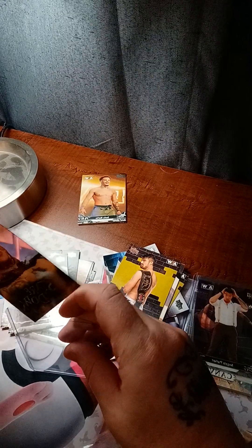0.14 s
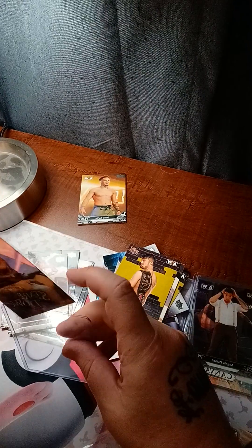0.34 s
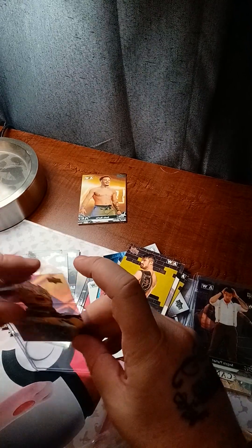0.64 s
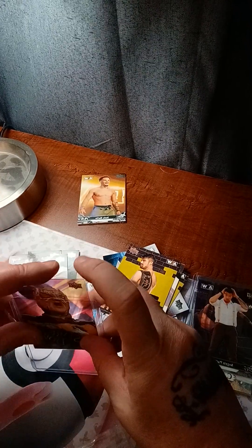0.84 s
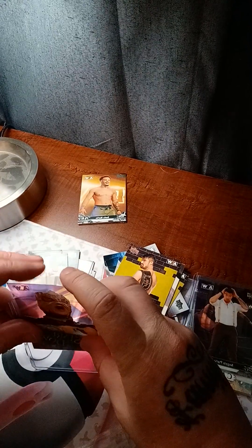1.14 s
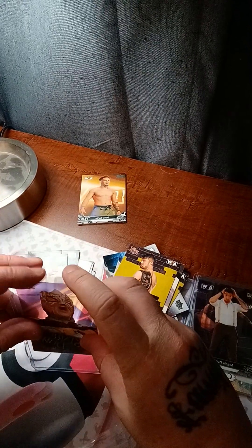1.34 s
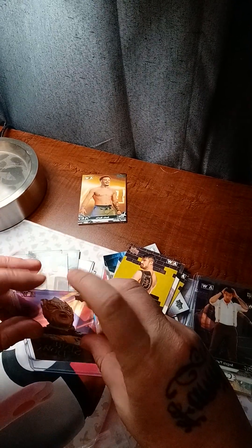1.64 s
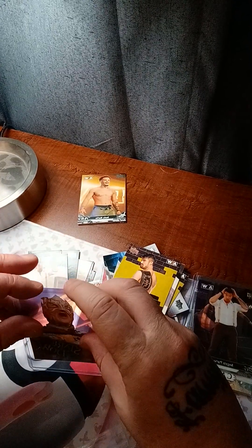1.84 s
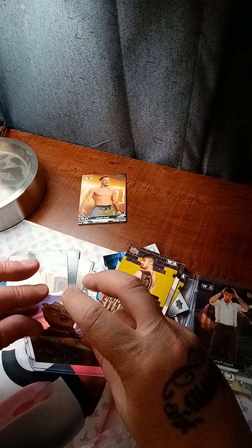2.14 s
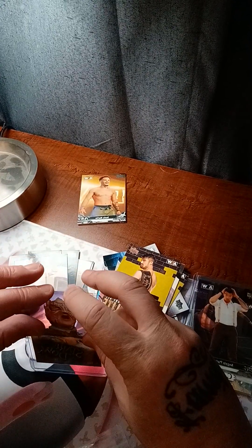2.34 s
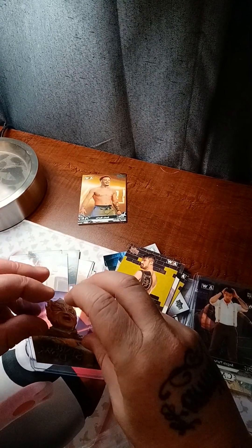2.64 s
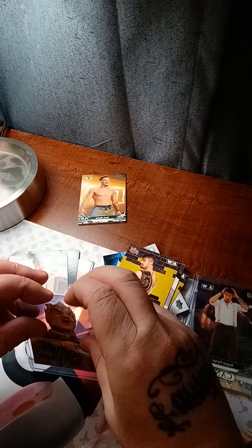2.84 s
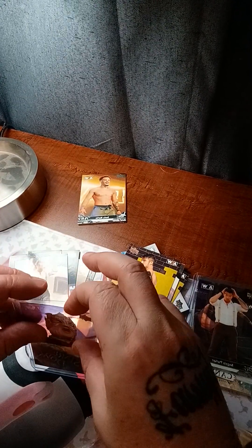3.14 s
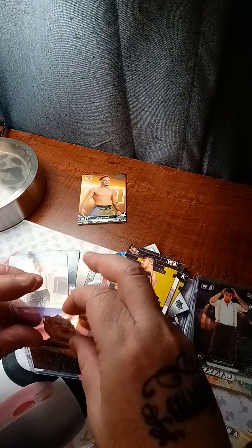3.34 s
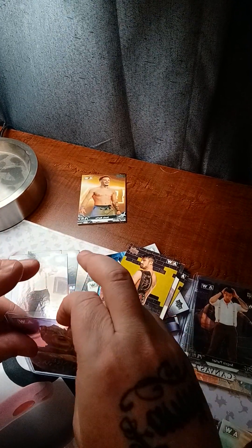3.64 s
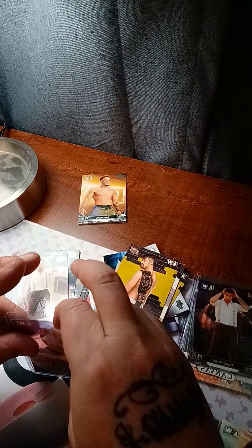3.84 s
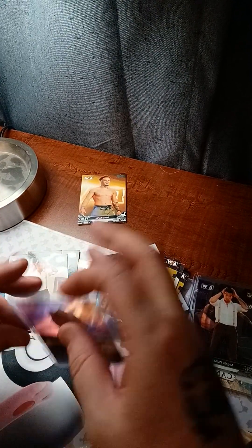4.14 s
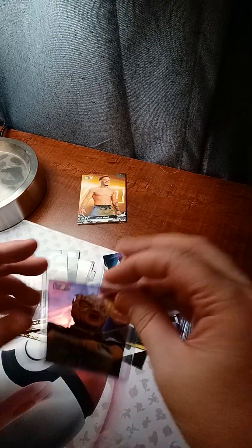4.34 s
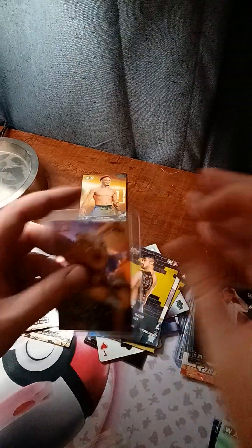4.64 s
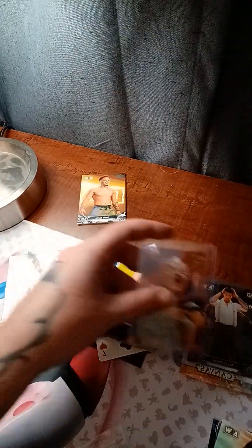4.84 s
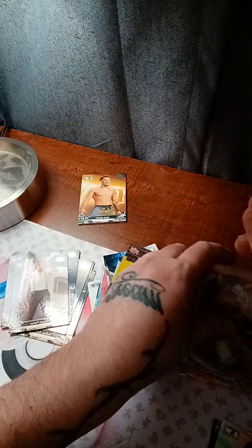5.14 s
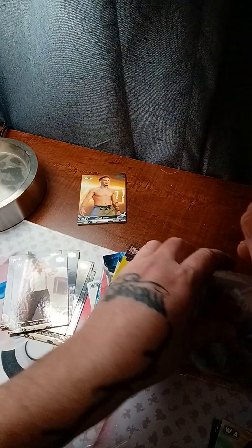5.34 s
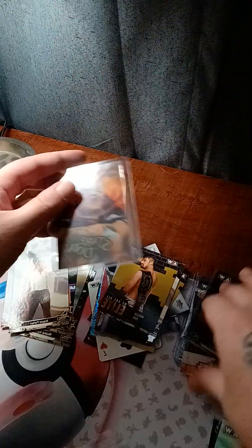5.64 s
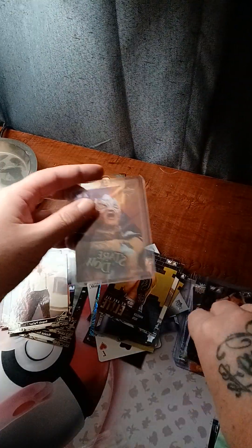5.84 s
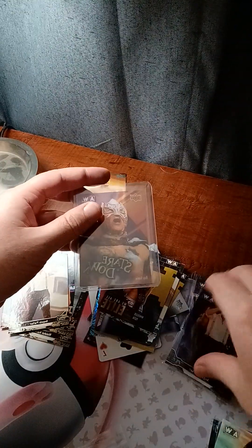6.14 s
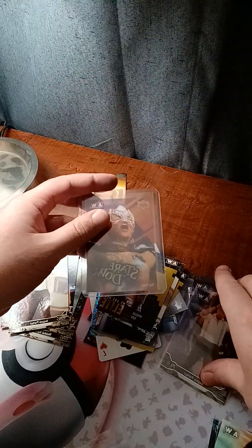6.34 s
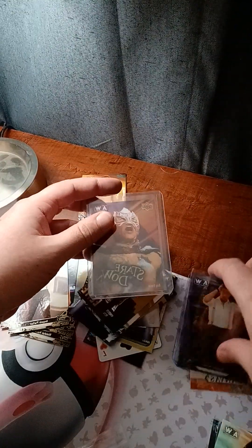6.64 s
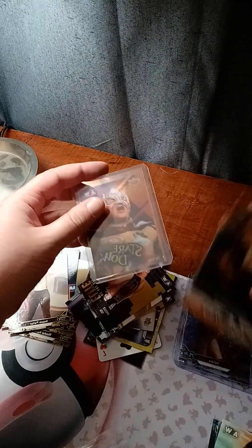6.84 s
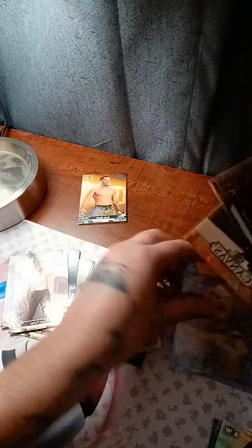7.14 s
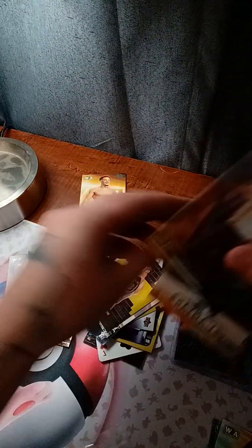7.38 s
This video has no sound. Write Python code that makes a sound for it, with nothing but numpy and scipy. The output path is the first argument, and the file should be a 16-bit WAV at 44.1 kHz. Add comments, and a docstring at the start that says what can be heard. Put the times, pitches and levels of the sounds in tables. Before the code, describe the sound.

Near a phone microphone in a small quiet room, hands work cards into stiff plastic holders over a wooden table. From 0.1 to 0.9 seconds, bright dry snaps and crackles come in small clusters, the sharpest near 0.55 and 0.8, with grainy scraping. Between 1.0 and 1.8, more clicks and short rubs, with soft low table bumps. Around 1.9 to 2.4 sliding turns faint, with very thin high squeaks and a wavering whispery scrape. From 2.8 to 4.7 it is nearly quiet, only tiny ticks and dull touches. Faint squeaks and rubbing return at 4.7 to 5.5, a bump at 5.7, and a crisp snap at 5.9. A tight burst of crackling runs 6.45 to 6.7. At 7.13, 7.16 and 7.21 a holder hits the stack in three growing knocks, the last a loud hard clack with woody thump and brief rattling tail, then a faint rub. Low, soft room noise continues throughout.

```python
"""Film snaps and scrapes throughout, as hands slide trading cards into stiff plastic holders by a phone in a quiet room.
Buckling film gives short resonant bursts; friction gives grainy noise, thin squeals and a wandering band.
Each touch excites the modes of the wooden table and swells a low rumble; the holder's rim ticks faintly.
A holder lands on a stack in three knocks at the end; a decaying tail and steady air noise lie behind."""
import sys
import numpy as np
from scipy import signal
from scipy.fft import rfft, irfft, next_fast_len
from scipy.io import wavfile
from scipy.ndimage import uniform_filter1d

SR = 44100
rng = np.random.default_rng(int(sys.argv[2]) if len(sys.argv) > 2 else 0)


def to_wav(s):
    """Save 16-bit WAV."""
    ch = np.atleast_2d(s).T  # columns
    pcm = np.round(np.clip(ch, -1, 1) * 32767)  # PCM
    wavfile.write(sys.argv[1], SR, pcm.astype(np.int16))


N = 331191

# the holder landing on the stack: t/s, relative peak/dB, body/dB and fizz/dB against the peak,
# body ring f/Hz, rasp ring f/Hz, decay time constant/ms
LANDINGS = [(7.1255, -37.5, -5.5, -6.5, 1050, 6750, 2), (7.1577, -20, 4, -2.5, 1840, 6390, 1.92),
            (7.212, -3.5, -4.5, -15.5, 790, 2920, 1.86)]
# where the hands work: t/s, left over right level/dB
HAND_PLACES = [(0, -1), (1.0, -1.5), (1.7, -1.5), (2.2, -3), (2.8, 0), (4.5, -0.5), (5.1, -2.5),
               (5.75, -1.5), (5.9, -2), (6.7, -0.5), (7.2, -1)]
# hands and cards meeting the table: t/s, level/dB, contact time/ms, swell of the low rumble/dB
TOUCHES = [(0.214, -50, 1.6, -60), (0.286, -40, 3.5, -52), (0.546, -62.5, 4, -72), (0.789, -52.5, 3.8, -61),
           (0.898, -112, 3.7, -74), (1.049, -64, 4.3, -56.5), (1.157, -46.5, 3.1, -62),
           (1.35, -53.5, 1.9, -73), (1.553, -56.5, 9.6, -67), (1.745, -47, 1.8, -65), (1.902, -80, 4, -78),
           (2.227, -58.5, 1.9, -69), (2.433, -60, 2.3, -63), (2.65, -64, 4.9, -62), (2.96, -72, 4.3, -70),
           (3.039, -67, 3.1, -56.5), (3.275, -67, 3.4, -62), (3.448, -76, 4, -68), (3.689, -53, 3.3, -55.5),
           (3.818, -60, 4.4, -74), (4.025, -59, 3.9, -65.5), (4.272, -59, 3, -58), (4.471, -63, 2.3, -92),
           (4.546, -65, 3.8, -90), (4.751, -76, 3.4, -72), (4.889, -60.5, 1.3, -95), (5.103, -47.5, 4, -68),
           (5.36, -55, 6.9, -59), (5.721, -41, 16.4, -53), (5.896, -48, 3.5, -65), (6.201, -65, 6.2, -69),
           (6.389, -76, 4, -56.5), (6.677, -67, 1.3, -60), (7.123, -43, 4.2, -76), (7.16, -26.5, 3.9, -69),
           (7.213, -12, 3.7, -53), (7.252, -20, 3, -55)]


def snaps():
    """Impulsive buckling: a fast-rising noise burst decays in milliseconds and rings where the sheet is held."""
    # film buckling, columns as for the landings
    buckles = [(0.1264, -34, -20.5, -3.5, 745, 7260, 2.8), (0.2164, -34, -12.5, -9.5, 1150, 7050, 1.9),
               (0.2876, -28, -4.5, -16.5, 1550, 6060, 1.9), (0.39, -38.5, -39, -8, 1190, 7180, 1.2),
               (0.4014, -39, -30, -12, 1550, 4470, 1.3), (0.409, -34.5, -18, -6, 1610, 4480, 0.93),
               (0.4168, -39.5, -16, -3, 1570, 5530, 1.5), (0.423, -35, -19.5, -4, 1660, 4930, 3.4),
               (0.431, -33, -20, -10.5, 1620, 5360, 1.1), (0.4738, -49, -10, 2, 1570, 6530, 1.2),
               (0.5218, -42, -13, 3, 2130, 5530, 1.7), (0.5402, -41.5, -19, -2, 2150, 5130, 4.5),
               (0.5525, -21, -26.5, -12.5, 1700, 8000, 2.6), (0.6501, -41.5, -38, -35, 2300, 4700, 4),
               (0.7796, -34.5, -16, -23, 2310, 4330, 3.8), (0.794, -27, -19.5, -11.5, 2300, 6100, 2.6),
               (0.8082, -33, -18, -5, 2250, 6040, 2.5), (1.0296, -49.5, -11, -19, 1180, 5170, 1.3),
               (1.1138, -32.5, -11, -10, 2300, 6170, 1), (1.1567, -37, -0.5, -3, 1100, 5620, 1.23),
               (1.1645, -32, -17, -7, 2320, 4600, 2), (1.1765, -45, -24, -14, 2100, 5270, 1.5),
               (1.252, -41, -12, -24, 1130, 7100, 2), (1.3045, -30, -31, -30, 2300, 4400, 1.7),
               (1.4564, -53, -7.5, -21, 2180, 6570, 3.2), (1.506, -28.5, -48, -52, 1600, 6700, 1.16),
               (1.555, -44.5, -29, -9, 1610, 5570, 1.4), (1.6524, -44, -12, -6, 2160, 5880, 3.2),
               (1.6634, -48, -3, -6, 1300, 4890, 0.94), (1.6683, -34.5, 3.5, -8, 1750, 3470, 0.68),
               (1.7446, -35.5, -1, 0, 780, 4530, 2.5), (1.7519, -26, -9, -6.5, 2400, 3660, 2.5),
               (1.865, -59, -3, -19, 1560, 3200, 1.7), (1.938, -51, -22, -12, 1560, 6500, 3),
               (2.0414, -43.5, -17, -17, 1200, 6760, 1.3), (2.304, -54.5, -3, -19, 1610, 4000, 1.6),
               (2.3201, -49, -18, -27, 1610, 3450, 1.45), (2.4076, -42, -18, -18, 2220, 6360, 2),
               (2.4357, -57.5, 0.5, -13, 1780, 5600, 5.2), (2.4663, -53.5, -25, -9, 1480, 5000, 1.6),
               (2.5407, -59.5, -8, -10, 1620, 5430, 7.2), (2.5606, -43.5, -7.5, -20, 2140, 4730, 3),
               (2.6463, -40.5, -29, -19, 2300, 7300, 1.5), (2.817, -48, -4, -9, 825, 3240, 1.3),
               (3.202, -60.5, -17, -8, 724, 3120, 1.9), (3.6978, -58.5, -24, -15, 735, 2520, 2.5),
               (4.0537, -53, -4.5, -7, 2490, 6700, 1.9), (4.276, -41.5, -13, -40, 2480, 3450, 6.3),
               (4.4706, -41.5, -14.5, -21, 810, 6350, 3.4), (4.49, -47.5, -7, -6, 1200, 4500, 1.8),
               (4.5502, -50.5, -30, -10, 756, 5500, 5.6), (5.0114, -53.5, -3.5, -2, 2180, 6940, 1.3),
               (5.053, -49, -9, -10, 1840, 5270, 8.8), (5.0784, -40, -9, -13, 1590, 7200, 2.2),
               (5.0914, -48, -3, -5, 2160, 4770, 4.2), (5.1016, -44, 13.5, -30, 1730, 2610, 1.95),
               (5.1466, -35, -9.5, -18, 2170, 5850, 0.64), (5.3544, -44.5, -3, -8, 2080, 3200, 3.2),
               (5.365, -44.5, -7, -8, 1530, 2530, 2.9), (5.3864, -57.5, 15, -13, 2180, 3160, 1.4),
               (5.446, -51, -3, -21, 1530, 3190, 1.3), (5.4775, -48.5, -15, -31, 1290, 4860, 1.5),
               (5.7854, -42, -9, -2, 1610, 2630, 2.5), (5.8978, -23, -6, -6.5, 1440, 7400, 1.3),
               (6.2894, -60, -6, -23, 1350, 6400, 1.3), (6.4658, -46.5, -21, -6, 1540, 3960, 2.1),
               (6.4879, -37, -10.5, -1, 2370, 5100, 1.1), (6.5244, -37.5, -15, -26, 2290, 4600, 1),
               (6.542, -27.5, -32, -9, 1550, 6570, 0.95), (6.575, -31, -43, -11, 1790, 4500, 1.4),
               (6.5891, -42, -14, 5, 750, 4590, 1.6), (6.6218, -24, -18, -9.5, 1830, 6700, 1.03),
               (6.6701, -30.5, -8, -12, 1510, 4830, 2.3), (6.6738, -24.5, -22, -11, 1310, 7100, 1.8),
               (6.6835, -24, -12, 3, 1170, 6400, 1.17), (6.8705, -51.5, -35, -12, 872, 9000, 5.4)]
    ring_share = 0.35  # the room hears only a share of each ring
    drive = np.zeros((2, 3, 2, N))  # to the phone or the room; rasp, body, fizz; left, right
    ms = np.arange(900) / SR * 1000
    hands = curve(HAND_PLACES)
    # room_db: share sent into the room; stray_db: chance spread of the left-right difference
    for rows, room_db, stray_db in ((buckles, -6.5, 1.1), (LANDINGS, -3.5, 0)):
        for s, peak_db, body_db, fizz_db, body_hz, rasp_hz, decay_ms in rows:
            rise = (1 - np.exp(-ms / (0.18 + 0.22 * decay_ms))) ** 2
            shape = rise * np.exp(-ms / max(decay_ms, .2))
            plain = pair(len(ms), .15) * shape / shape.max()
            broad = np.array([0.59 * plain, 0.42 * plain, plain])
            rasp_ring = 1.17 * resonate(plain, rasp_hz, 1700)
            body_ring = 0.93 * resonate(plain, body_hz, 580)
            rings = np.array([rasp_ring, body_ring, 0 * plain])
            levels = gain_of(peak_db + np.array([-10, body_db, fizz_db]))[:, None, None]
            pan_db = hands[round(s * SR)] + stray_db * rng.standard_normal()
            burst = np.array([broad + rings, gain_of(room_db) * (broad + ring_share * rings)])
            add(drive, s, burst * levels * sides(pan_db)[:, None])
    return drive


def rubbing():
    """Dry friction: noise in uneven grains and stray crackles, scaled by the pressure of the hand."""
    # the holder hums under friction: f/Hz, width/Hz
    holder_modes = [(1190, 220), (1580, 280), (2250, 300)]
    hum_db = -17
    _, _, z = signal.stft(pair(N, 0.05), SR, nperseg=256)
    # the contact patch keeps changing, so other parts of the spectrum light up from moment to moment
    patches = uniform_filter1d(rng.standard_normal(z.shape[1:]), size=5, axis=0)
    patches = uniform_filter1d(patches, size=9, axis=1)
    noise = signal.istft(z * gain_of(2.8 * evened(patches)), SR, nperseg=256)[1][:, :N]
    # about 60 crackles a second
    crackles = (rng.random(N) < 60 / SR) * gain_of(2.1 * np.minimum(rng.exponential(1, N), 3))
    crackles = signal.oaconvolve(crackles, np.exp(-np.arange(200) / 35))[:N]
    grain = gain_of(2.2 * slow(N, 40) + 1.8 * slow(N, 350))
    rough = evened((grain + crackles) * noise)
    # the hums gather the body region into narrow bands that come and go with the grip
    hums = np.zeros((2, N))
    for hz, width in holder_modes:
        band = signal.lfilter(*signal.iirpeak(hz, hz / width, SR), rough)
        hums += band * gain_of(5 * slow(N, 1600))
    body = 0.63 * rough + gain_of(hum_db) * evened(hums)
    return pressure() * np.array([rough, body, rough])


def pressure():
    """Normal force sets friction level: faint sliding, with each stroke swelling and easing off on top."""
    # strokes of card on film: loudest at t/s, rise/s, fall/s, rasp/dB, body/dB and fizz/dB against the rasp
    strokes = [(0.216, 0.017, 0.029, -62, 7, 2.5), (0.3, 0.11, 0.031, -79, 9, -2.5),
               (0.42, 0.079, 0.05, -59.5, -14, 4), (0.69, 0.32, 0.58, -70.5, -16, 6),
               (0.905, .014, 0.019, -54.5, -8, 3), (0.996, 0.0083, 0.016, -79, 10, 20),
               (1.052, 0.019, 0.028, -58, -3, -7), (1.099, 0.018, 0.1, -46, -8, -5),
               (1.251, 0.02, 0.026, -60.5, -20, 10), (1.362, .012, 0.0095, -59, -1.5, 2),
               (1.46, 0.15, 0.037, -78, -28, 4), (1.638, .009, 0.012, -55, -4, -1),
               (1.8, 0.078, 0.66, -72.5, -6, 1), (2.234, 0.022, 0.019, -61.5, -7, -2),
               (2.805, 0.0086, .03, -70, -6, 1.5), (4.012, 0.014, 0.046, -78.5, 7, -7),
               (4.3, 0.022, 0.062, -74.5, -5, -12), (4.5, 0.034, 0.084, -76.5, -4, 2),
               (5.105, 0.078, 0.17, -74.5, 11, 0), (5.345, 0.015, .08, -67, 1.5, -8),
               (5.48, 0.12, 0.074, -80, 10, 8), (5.69, 0.018, .02, -87.5, 5, -1),
               (5.744, 0.017, 0.034, -70, -18, 8), (5.785, 0.047, .017, -65.5, -1, 4),
               (5.894, 0.023, 0.017, -54.5, -4, 4), (6.25, 0.029, .08, -80.5, -4, 10),
               (6.63, .012, 0.042, -56, -6, 3), (6.667, 0.015, .012, -62, 4, -4),
               (6.699, 0.0082, 0.044, -53.5, 6, 9), (6.721, .02, .035, -56, -2, -6),
               (6.885, 0.04, 0.022, -75, -17, 5), (6.92, 0.12, 0.37, -85, -15, 8),
               (7.42, 0.033, 0.028, -66.5, -7.5, 6)]
    # faint sliding between the strokes: t/s, rasp/dB
    sliding = [(0.0, -86), (0.11, -84), (0.19, -80), (1.0, -85), (1.6, -81), (2.0, -102), (2.28, -81.5),
               (2.45, -82), (2.84, -83.5), (3.05, -90), (4.37, -88.5), (4.75, -86), (5.06, -78.5),
               (5.4, -73.5), (5.55, -90.5), (6.3, -90.5), (6.7, -69), (6.85, -85), (7.51, -88.5)]
    rise_bend, fall_bend = 1.47, 1.9  # exponents; higher = more pointed strokes
    # rasp, body and fizz of the sliding against its rasp, dB
    press = gain_of(curve(sliding) + np.array([[0], [-1.55], [-1.5]]))
    for s, rise, fall, rasp_db, body_db, fizz_db in strokes:
        up, down = (np.sin(np.pi / 2 * np.arange(0, span, 1 / SR) / span) for span in (rise, fall))
        shape = np.r_[up ** rise_bend, down[::-1] ** fall_bend]
        add(press, s - rise, gain_of(rasp_db + np.array([[0], [body_db], [fizz_db]])) * shape)
    return press[:, None] * sides(curve(HAND_PLACES))


def settling():
    """Repeated small collisions: loose holders in the stack shiver after each knock, a dense dying rattle."""
    t60, shares_db = 0.33, [-29.5, -23.5, -43]  # decay/s; rasp, body, fizz against the peak/dB
    out, t = np.zeros((3, 2, N)), np.arange(SR // 3) / SR
    for s, peak_db, *_ in LANDINGS:
        rattle = pair(len(t), 0.11) * gain_of(-60 * t / t60) * (1 - np.exp(-t / 0.017))
        add(out, s, gain_of(peak_db + np.array(shares_db))[:, None, None] * rattle)
    return out


def film(drive):
    """Source and filter: the plastic colours its drive in three overlapping regions, rasp, body and fizz."""
    # radiation of the film: f/Hz, relative density/dB per Hz
    film_spectrum = [(290, 3.5), (500, -11.5), (836, -16.5), (1260, -12.5), (1990, -15.5), (2780, -11),
                     (3520, -3.5), (5630, 2), (6240, 3), (7890, -2.5), (10100, 1), (12100, 10.5),
                     (13600, 8.5), (15700, 8), (16700, -17)]
    size = next_fast_len(N)
    hz = np.fft.rfftfreq(size, 1 / SR)
    body = 1 / (1 + (hz / 2500) ** 8)
    fizz = 1 / (1 + (9000 / (hz + 1)) ** 16)
    thin = 1 / (1 + (550 / (hz + 1)) ** 4)  # a small sheet radiates little bass
    regions = np.clip([1 - body - fizz, body, fizz], 0, 1)
    shares = np.sqrt(regions * thin) * gain_of(read(film_spectrum, hz))
    shares /= np.sqrt(np.mean(shares ** 2, axis=1, keepdims=True))
    return irfft((rfft(drive, size) * shares[:, None]).sum(0), size)[:, :N]


def squeals():
    """Friction-driven oscillation: thin tones of sliding film that waver in level and pitch."""
    # each squeal bends through three pitches: t/s, length/s, first f/Hz, middle f/Hz, last f/Hz, relative level/dB
    glides = [(1.92, .08, 12800, 13050, 12800, -76), (2.0, .125, 12780, 13050, 13150, -81),
              (2.12, .115, 13000, 12870, 12300, -80), (1.95, .035, 14900, 15050, 15100, -84),
              (1.995, .048, 14950, 14950, 15200, -80), (1.98, .062, 11750, 11620, 11720, -82),
              (1.94, .05, 12250, 12330, 12250, -86), (2.07, .1, 14200, 14300, 14000, -83),
              (2.05, .07, 11000, 11250, 11200, -87), (2.165, .058, 15150, 14650, 14250, -83),
              (4.725, .04, 10900, 12200, 13100, -90), (4.765, .075, 10900, 11450, 11450, -86),
              (4.82, .09, 14150, 14200, 14650, -89), (4.86, .135, 11250, 11620, 11700, -80),
              (4.9, .11, 12950, 13350, 13200, -80), (4.915, .07, 12200, 12450, 12550, -85),
              (4.98, .07, 12000, 11600, 11500, -84), (5.11, .06, 11850, 11950, 12200, -80),
              (5.19, .075, 10950, 10980, 11100, -87), (5.18, .1, 14600, 14550, 14150, -81),
              (5.28, .07, 14100, 13600, 12850, -89)]
    out = np.zeros(N)
    for s, length, first, middle, last, db in glides:
        t = np.arange(0, length, 1 / SR) / length
        bend = np.polyval(np.polyfit([0, .5, 1], [first, middle, last], 2), t)
        pitch = bend * (1 + .003 * slow(len(t), 300))
        blur = evened(resonate(rng.standard_normal(len(t)), pitch, 260))  # friction noise hugging the tone
        tone = 1.13 * np.sin(2 * np.pi * np.cumsum(pitch) / SR) + 0.24 * blur
        level = gain_of(db + 1.1 * slow(len(t), 400))
        add(out, s, tone * level * signal.windows.tukey(len(t), .3))
    return out * sides(-22)[:, None]


def whisper():
    """Resonance of scrape noise: one band wanders in frequency while the card goes in."""
    # path of the band: t/s, f/Hz, relative level/dB
    path = [(1.879, 4600, -75), (1.944, 4760, -74.5), (2.034, 4130, -98), (2.04, 4170, -72),
            (2.21, 4460, -77.5), (2.23, 4640, -78), (2.282, 4480, -81), (2.318, 3470, -67.5),
            (2.381, 4180, -94)]
    s, hz, db = np.transpose(path)
    t = np.arange(s[0], s[-1], 1 / SR)
    band = evened(resonate(pair(len(t), 0.24), np.interp(t, s, hz), 1100))
    out = np.zeros((2, N))
    add(out, s[0], band * gain_of(np.interp(t, s, db)) * signal.windows.tukey(len(t), .2))
    return out * sides(-8.0)[:, None]


def rim():
    """Damped resonance: a touch of the holder's rim gives a faint click and a short narrow-band rattle."""
    # faint ringing ticks: t/s, relative level/dB
    ticks = [(2.796, -70), (3.0276, -59), (3.0524, -63.5), (3.212, -67.5), (3.3085, -74), (3.353, -73.5),
             (3.5552, -64), (3.577, -71), (3.699, -83)]
    rim_hz, width_hz, t60 = 3220, 370, 0.074
    out, t = np.zeros((2, N)), np.arange(3000) / SR
    for s, db in ticks:
        touch = pair(len(t), 0.47)
        rattle = evened(resonate(touch, rim_hz, width_hz)) + 1.7 * touch * np.exp(-t / 0.0073)
        add(out, s, gain_of(db - 5.5 - 60 * t / t60) * rattle * np.minimum(t / 0.0014, 1))
    return out * sides(-2.5)[:, None]


def table():
    """Modal excitation: a soft push rings the table top; a longer contact leaves only the lowest modes."""
    # modes of the table top: f/Hz, relative level/dB, T60/s
    modes = [(103.2, -19.5, 0.27), (117.2, -10.5, 0.15), (158.9, -9.5, 0.18), (256.2, -1.5, 0.081),
             (393.3, -2, 0.11)]
    # upper modes against the peak; softer contacts stir them less
    upper_db, upper_db_per_ms, upper_t60 = -11.5, -1.78, 0.29
    out, t = np.zeros((2, N)), np.arange(SR // 3) / SR
    ring = sum(gain_of(db - 60 * t / t60) * np.sin(2 * np.pi * hz * t) for hz, db, t60 in modes)
    ring *= 1 - np.exp(-t / 0.0021)  # the wave needs time to fill the board
    upper = signal.butter(2, [300, 850], "band", fs=SR, output="sos")
    for s, db, contact_ms, _ in TOUCHES:
        push = np.hanning(max(round(contact_ms * SR / 1000), 5))
        boom = signal.oaconvolve(ring, push)[:len(t)]
        # upper modes lie too close to count and blur into a dying band, unlike at the two ports
        dense = evened(signal.sosfilt(upper, pair(len(t), 0.19)))
        dense *= gain_of(upper_db + upper_db_per_ms * contact_ms - 60 * t / upper_t60)
        add(out, s, gain_of(db) * (boom / abs(boom).max() + dense * (1 - np.exp(-t / 0.0017))))
    # a table top is too small for deep bass
    return signal.sosfilt(signal.butter(2, 80, "high", fs=SR, output="sos"), out)


def rumble():
    """Noise-driven low resonances: the lowest swells with each touch, the others waver; both ports nearly agree."""
    # resonances in the rumble: f/Hz, width/Hz, relative level/dB
    low_modes = [(103.8, 26.2, -4.5), (155, 90, -9.5), (226.3, 10.1, -5.5)]
    lag_s, width_s, rest_db = 0.035, 0.042, -72.5  # each swell peaks just after the touch
    swell, t = np.full(N, gain_of(rest_db)), np.arange(-SR // 5, SR // 5) / SR
    shape = np.exp(-.5 * ((t - lag_s) / width_s) ** 2)
    for s, *_, swell_db in TOUCHES:
        add(swell, s + t[0], gain_of(swell_db) * shape)
    low, *rest = (gain_of(db) * evened(resonate(pair(N, 0.87), hz, width)) for hz, width, db in low_modes)
    return low * swell + gain_of(-73.5 + 2.5 * slow(N, 2500)) * sum(rest)


def room(x):
    """Reverberation: sparse taps of random sign from 4 ms on, each band dying at its own speed."""
    # decay of the room: f/Hz, T60/s
    decay = [(100, 0.7), (500, 0.26), (2000, 0.25), (6000, 0.27), (14000, 0.19)]
    taps = np.zeros((2, SR // 2))
    grid = np.arange(180, SR // 2 - 20, 20)
    at = grid + rng.integers(0, 20, (2, len(grid)))
    np.put_along_axis(taps, at, rng.choice([-1., 1.], at.shape), 1)
    hz, t, z = signal.stft(taps, SR, nperseg=256)
    tail = signal.istft(z * gain_of(-60 * t / read(decay, hz)[:, None]), SR, nperseg=256)[1]
    return signal.fftconvolve(x, tail / np.linalg.norm(tail[0]), axes=1)[:, :N]


def air():
    """Shaped random noise: the steady noise of the house, lumpy in the bass and smoother in the treble."""
    # spectrum of the air noise: f/Hz, relative density/dB per Hz
    air_spectrum = [(18, -37), (30, 1.5), (79, -10), (114, -1), (179, -7), (232, -5.5), (318, -12),
                    (598, -21.5), (3120, -35.5), (4170, -53.5), (5860, -90), (6510, -28), (9410, -43.5),
                    (12900, -41), (15900, -30.5)]
    # left-right likeness: f/Hz, correlation
    likeness = [(60, 0.8), (180, 0.68), (550, 0.27), (1650, 0.01), (4970, 0.079), (15000, 0.01)]
    frames, hz = N // 512 + 5, np.fft.rfftfreq(2048, 1 / SR)
    a, b, c, d, patches = rng.standard_normal((frames, 1025, 5)).T
    patches = evened(uniform_filter1d(uniform_filter1d(patches, 5, 0), 10, 1))
    same = np.clip(read(likeness, hz), -1, 1)[:, None]
    left = a + 1j * b
    right = same * left + np.sqrt(1 - same ** 2) * (c + 1j * d)
    lumpy_db = 1.1 + 3.2 / (1 + (hz / 400) ** 2)
    z = np.array([left, right])
    z *= gain_of(read(air_spectrum, hz)[:, None] + lumpy_db[:, None] * patches)
    noise = evened(signal.istft(z, nperseg=2048, noverlap=1536)[1][:, :N])
    return gain_of(-70.5) * noise * sides(-3.9)[:, None]


def gain_of(db):
    """Logarithmic level: decibels to an amplitude factor."""
    return 10 ** (np.asarray(db) / 20)


def evened(x):
    """Power normalisation: scales to rms 1."""
    return x / np.sqrt(np.mean(x ** 2) + 1e-20)


def read(points, hz):
    """Logarithmic frequency scale: interpolates a spectrum table along it."""
    f, value = np.transpose(points)
    return np.interp(np.log(hz + 1), np.log(f + 1), value)


def curve(points):
    """Linear interpolation: a time table read at every sample."""
    return np.interp(np.arange(N) / SR, *np.transpose(points))


def add(mix, s, sound):
    """Superposition: mixes a sound in at time s."""
    part = mix[..., round(s * SR):][..., :sound.shape[-1]]
    part += sound[..., :part.shape[-1]]


def sides(pan_db):
    """Level-difference stereo: left and right factors, positive towards the left."""
    return gain_of(np.array([pan_db, -pan_db]) / 2)


def pair(size, same):
    """Partial coherence: noise for two microphone ports that share only part of their power."""
    common, left, right = rng.standard_normal((3, size))
    same = np.clip(same, 0, 1)
    return np.sqrt(same) * common + np.sqrt(1 - same) * np.array([left, right])


def slow(size, span):
    """Low-passed noise: smooth chance of rms 1 that changes over about span samples."""
    smooth = uniform_filter1d(rng.standard_normal(size), round(span))
    return evened(uniform_filter1d(smooth, round(span)))


def resonate(x, hz, width):
    """Heterodyne resonance: shifts the curve hz down to zero, smooths twice and shifts back."""
    turn = np.exp(2j * np.pi * np.cumsum(hz * np.ones(x.shape[-1])) / SR)
    r = np.exp(-np.pi * width / SR)
    smooth = signal.lfilter([(1 - r) ** 2], [1, -2 * r, r * r], x / turn + 1e-18)
    return 2 * (turn * smooth).real


def scene():
    """Superposition of plastic and table, the echo of the plastic in the room, and the air."""
    near, far = snaps()
    rub = rubbing()
    tones = squeals() + rim() + whisper()
    echo = room(film(far + gain_of(-9.5) * rub) + gain_of(-11.0) * tones)
    return film(near + rub + settling()) + tones + echo + table() + rumble() + air()


def record(dry):
    """Band limiting: the microphone loses the deepest bass; the top treble is shelved down, then cut off."""
    thin = signal.sosfilt(signal.butter(3, 65, "high", fs=SR, output="sos"), dry)
    edges = [0, 15750, 15950, 16650, 16800, SR / 2]  # Hz
    gains = [1, 1, .1, .1, 0, 0]
    treble = signal.firwin2(1023, edges, gains, window=("kaiser", 9), fs=SR)
    return signal.oaconvolve(thin, treble[None], "same")


dry = scene()
out = record(dry)
to_wav(out)
```